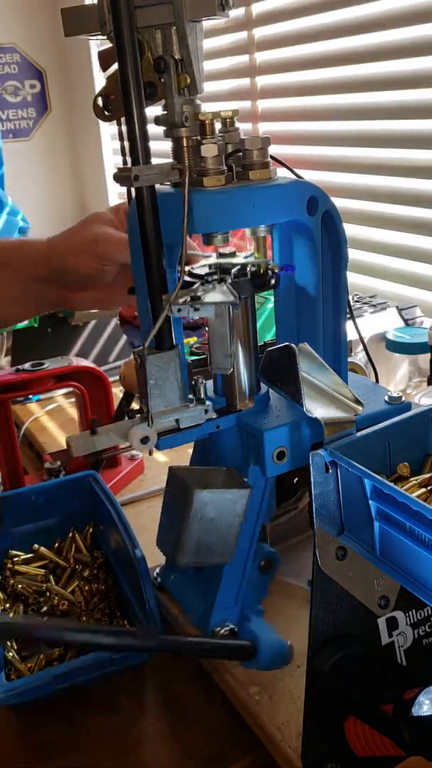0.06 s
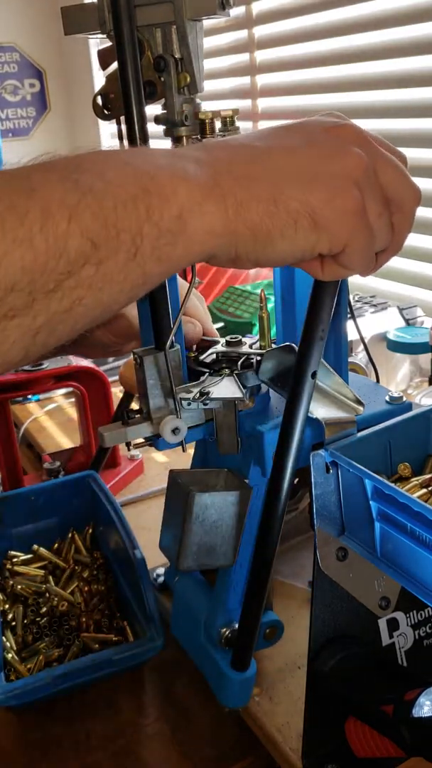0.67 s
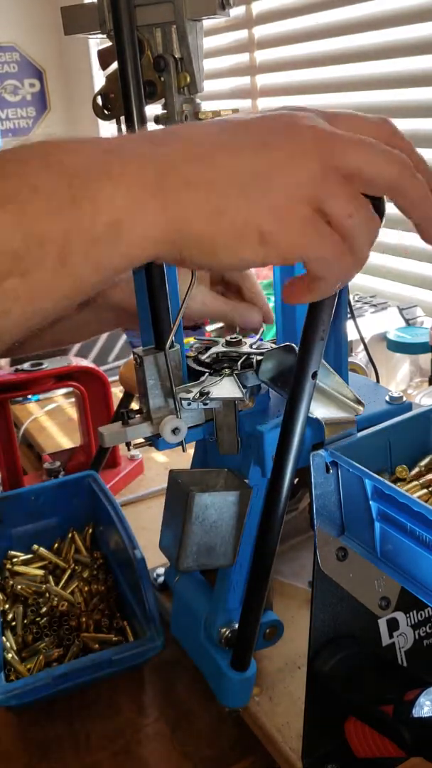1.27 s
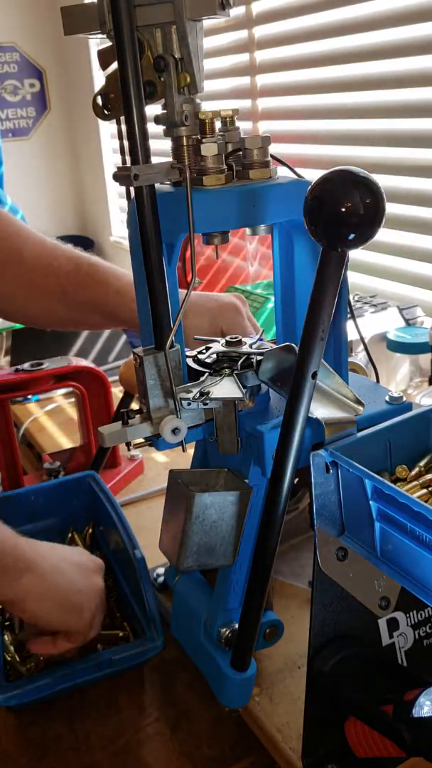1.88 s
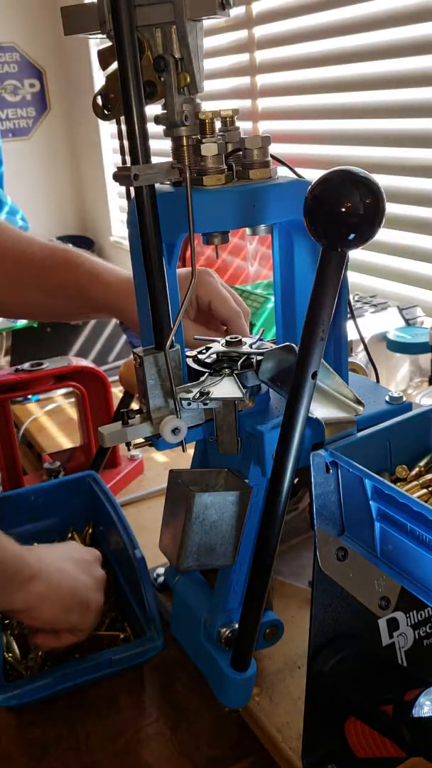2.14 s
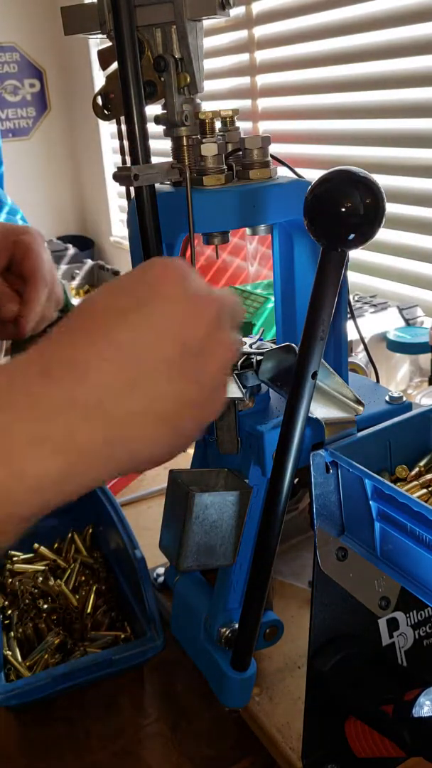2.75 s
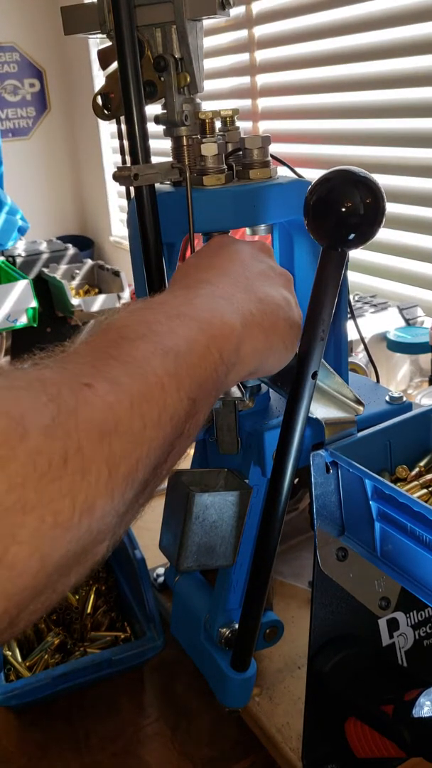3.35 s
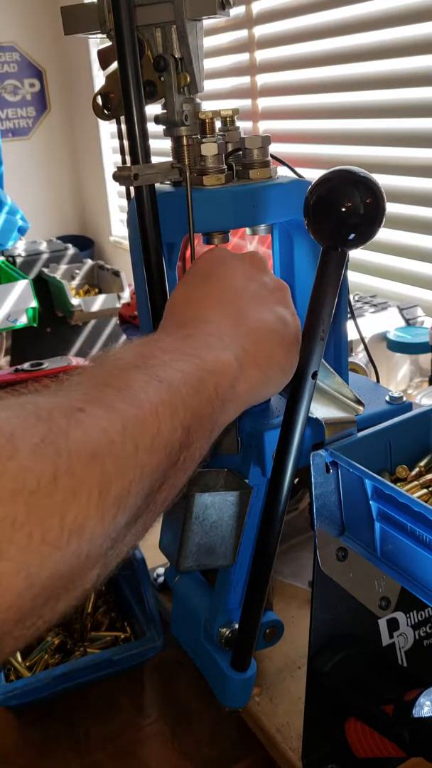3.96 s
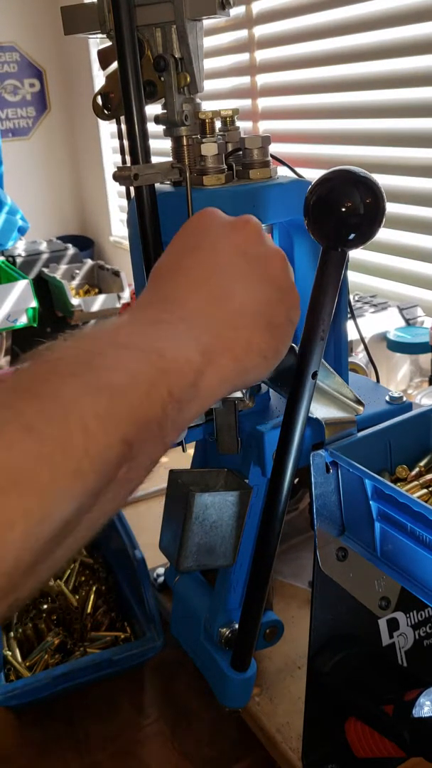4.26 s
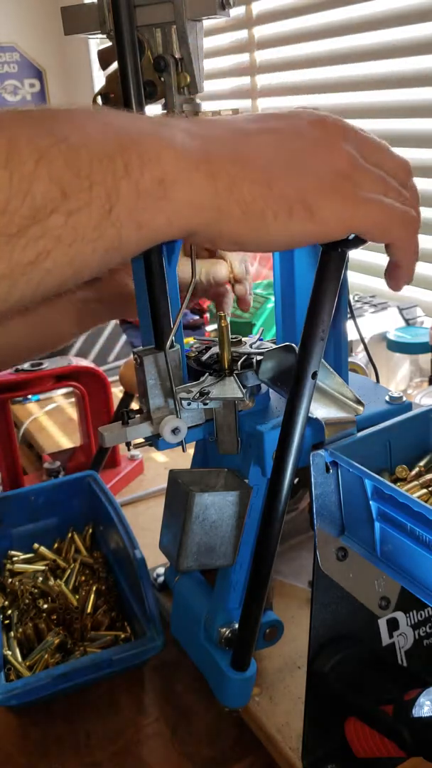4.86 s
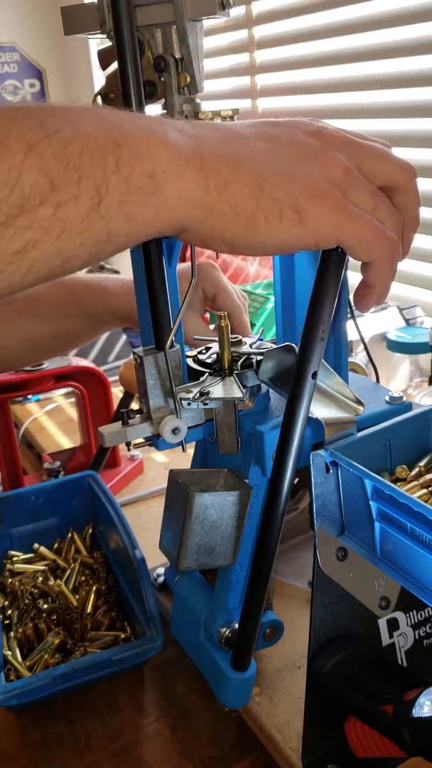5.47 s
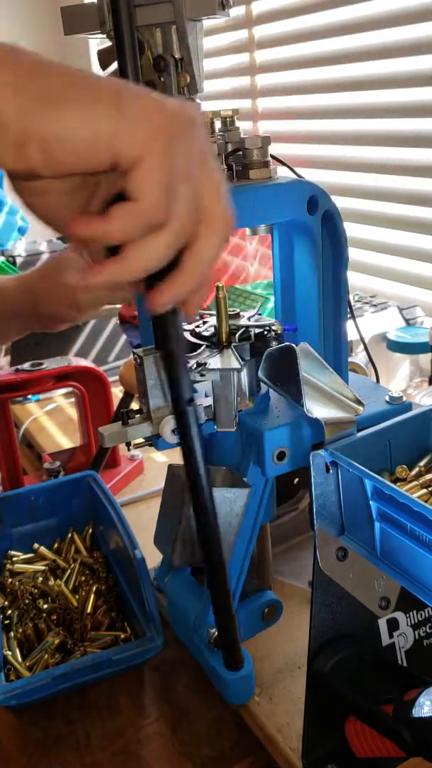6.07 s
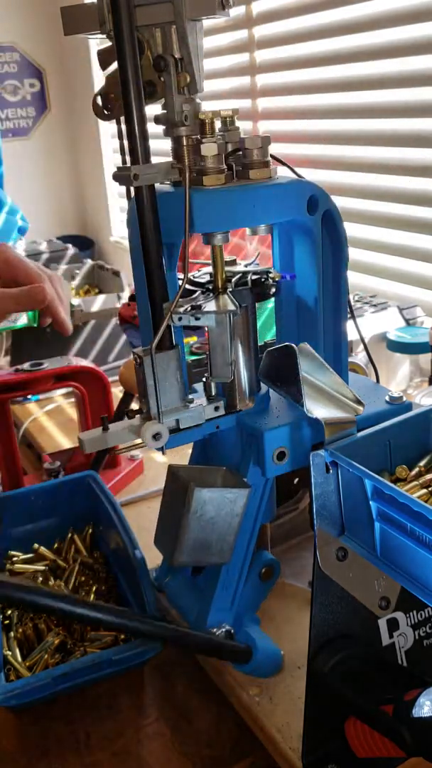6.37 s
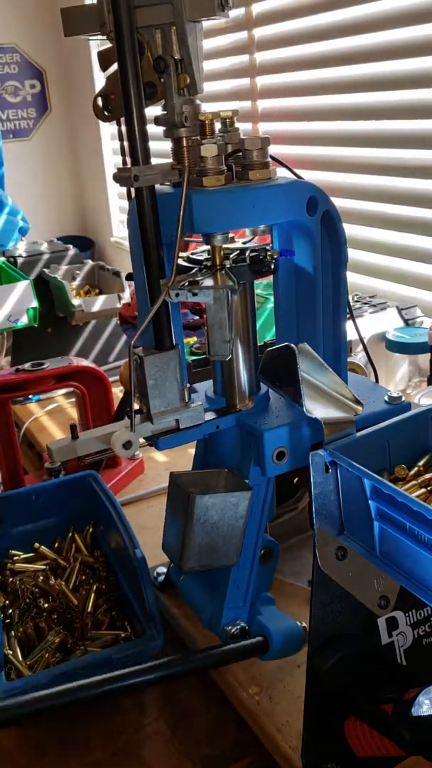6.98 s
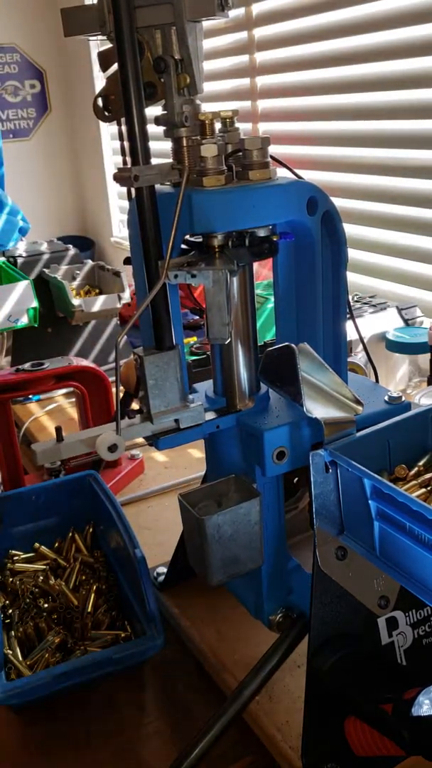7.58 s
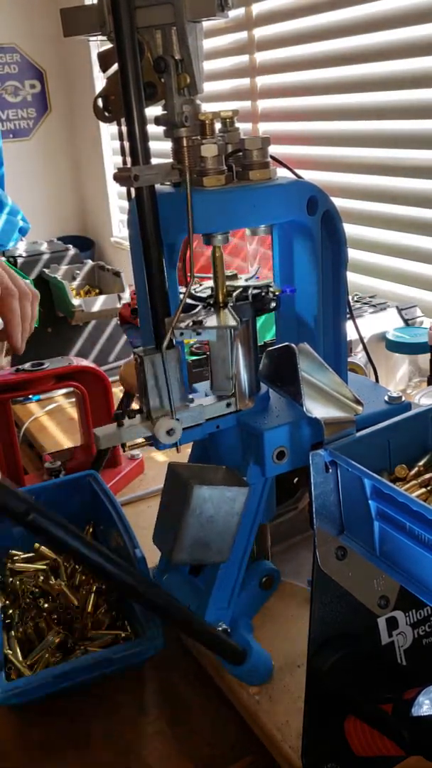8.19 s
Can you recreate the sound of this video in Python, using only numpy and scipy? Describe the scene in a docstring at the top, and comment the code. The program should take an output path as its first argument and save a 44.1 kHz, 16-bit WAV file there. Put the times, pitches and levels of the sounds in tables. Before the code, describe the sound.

In a small workshop with a faint low hum, the steel parts of a reloading press snap and slide near the microphone. Brass rings out and bounces in a plastic bin, and a heap of cases clinks as it is stirred. Small parts tick softly into place. Following a lull, the press runs through another stroke, clicking, scraping and knocking, the wooden bench thudding beneath it.

```python
"""Reloading press on a wooden bench

A hand-worked press clicks and slides in a small workshop, over room air and a faint motor hum.
A brass case pings free and tumbles into a plastic bin. A hand rummages for the next case and sets it
in the plate with a bullet on top; the lever is pulled again, clanking and thudding through the bench.
Contacts are short cracks of shaped noise; metal, plastic and wood ring in decaying modes."""
import sys
import numpy as np
from scipy import signal
from scipy.fft import rfft, irfft
from scipy.io import wavfile

SR = 44100
rng = np.random.default_rng(int(sys.argv[2]) if len(sys.argv) > 2 else 0)


def to_wav(sig):
    """Store sig (one row per channel, or 1-D mono) as 16-bit WAV at the path in sys.argv[1].

    Samples outside -1..1 are clipped; the rate is SR.
    """
    pcm = np.clip(np.atleast_2d(sig), -1, 1) * 32767
    pcm = np.round(pcm).astype(np.int16)
    wavfile.write(sys.argv[1], SR, pcm.T)  # frames by channels


N = 363384
TIME = np.arange(N) / SR

# stereo image of the room and of close sounds: frequency_hz, left_right_correlation
ROOM_IMAGE = [(100, 0.86), (250, 0.95), (500, 0.21), (1000, 0.7), (2000, 0), (16000, 0)]
CLOSE_IMAGE = [(200, 0.82), (1200, 0.84), (3000, 0.85), (8000, 0.45), (16000, 0.13)]
# bass-heavy colour of room air and bench rumble: frequency_hz, level_db
LOW_SPECTRUM = [(15, -51.5), (25, -22.5), (64, -11), (92, -9.5), (105, -9.5), (123, -2), (145, -8),
                (317, -20), (363, -22.5), (439, -19), (754, -35.5), (1790, -22.5), (2350, -38.5),
                (4490, -35.5), (16000, -49)]
# the lever loads the bench: start_s, level_db, tilt_db_per_octave
BENCH_THUDS = [(0.169, -56, 13.5), (.386, -41.5, 6.5), (.548, -43, 3.5), (0.624, -36, -0.5),
               (5.799, -45.5, 1.5), (6.284, -43, 5.5), (6.711, -31, -1.5), (7.126, -36, -2),
               (7.248, -34.5, 6), (7.507, -27, 1), (7.521, -30, -2), (7.737, -33.5, -4), (7.815, -37.5, 2),
               (7.841, -29.5, 0.5), (7.997, -26.5, -1), (8.149, -29, -5), (8.176, -36.5, 0)]
# single cases knock in the heap as the hand searches: start_s, level_db
HEAP_TAPS = [(1.7014, -29), (1.7265, -35), (1.845, -29), (1.926, -25), (1.954, -20), (1.9667, -13.5),
             (1.9751, -15), (1.999, -9), (2.0407, -5.5), (2.08, -8.5), (2.1904, -12), (2.2227, -19),
             (2.265, -13.5), (2.298, -19.5), (2.306, -21.5), (2.343, -24.5), (2.3764, -16.5),
             (2.3837, -21.5), (2.3912, -20.5), (2.4422, -14), (2.4614, -19.5), (2.4934, -48)]


def amp(db):
    """Decibels to gain."""
    return 10 ** (np.asarray(db) / 20)


def unit(x):
    """Scales to rms 1."""
    return x / np.sqrt(np.mean(x ** 2) + 1e-20)


def curve_at(points, hz):
    """Reads a curve on a log-frequency axis."""
    point_hz, value = np.transpose(points)
    return np.interp(np.log(hz + 1), np.log(point_hz + 1), value)


def add(mix, start_s, sound):
    """Drops a stereo sound into the mix."""
    part = mix[:, max(round(start_s * SR), 0):][:, :sound.shape[1]]
    part += sound[:, :part.shape[1]]


def panned(db):
    """Channel gains with the left louder by db."""
    return unit(amp([[db / 2], [-db / 2]]))


def colour(x, spectrum):
    """EQ by a curve of frequency_hz, level_db."""
    hz = np.fft.rfftfreq(x.shape[-1], 1 / SR)
    return irfft(rfft(x) * amp(curve_at(spectrum, hz)), x.shape[-1])


def stereo_noise(image, size=N):
    """White noise whose stereo width changes with frequency."""
    left, other = rfft(rng.standard_normal((2, size)))
    alike = np.clip(curve_at(image, np.fft.rfftfreq(size, 1 / SR)), -1, 1)
    return irfft([left, alike * left + np.sqrt(1 - alike ** 2) * other], size)


def decay(t, t60):
    """A fade that falls 60 dB in t60 seconds."""
    return np.exp(-np.log(1000) * t / t60)


def ring(hz, t60, phase_turns, size=16384):
    """One dying mode."""
    t = np.arange(size) / SR
    return np.sin(2 * np.pi * (hz * t + phase_turns)) * decay(t, t60)


def cluster(hz, spread_hz, t60, count):
    """Close modes that beat against each other, with their own phases on each side."""
    offsets = (np.arange(count) + rng.random(count)) / count * 2 - 1
    return sum(ring(hz + spread_hz * k, t60, rng.random((2, 1))) for k in offsets) / np.sqrt(count)


def struck(modes, spread_hz):
    """All modes of an object, each a beating cluster."""
    return sum(amp(db) * cluster(hz, spread_hz, t60, count=5) for hz, db, t60 in modes)


def gesture(start_s, length_s, db, swell_db_per_s, attack_s, release_t60):
    """Envelope of one movement: a quick attack, a hold that swells or sags, a release."""
    t = np.maximum(TIME - start_s, 0)
    hold = amp(db + swell_db_per_s * np.minimum(t, length_s))
    return np.minimum(t / attack_s, 1) * hold * decay(np.maximum(t - length_s, 0), release_t60)


def aftermath(hits, t60):
    """Envelope that jumps with each hit and then dies away."""
    power = np.zeros(N)
    for start_s, db, *_ in hits:
        power[round(start_s * SR)] += amp(db) ** 2
    return np.sqrt(signal.lfilter([1], [1, -decay(1 / SR, t60) ** 2], power + 1e-24))


def grains(per_s, spread_db, t60, size=1024):
    """A random train of tiny cracks, a few louder than the rest."""
    hits = amp(spread_db * np.minimum(rng.exponential(1, N), 3)) * (rng.random(N) < per_s / SR)
    power = signal.oaconvolve(hits ** 2, decay(np.arange(size) / SR, t60) ** 2)[:N]
    return unit(np.sqrt(abs(power)) * stereo_noise(CLOSE_IMAGE))


def contact(spectrum, db, tilt, t60, pan_db, lag_ms, snap_db, snap_t60, rise_s, size=8192):
    """A hard snap on a quickly dying crack of noise, reaching the left ear a little later."""
    t = np.arange(size) / SR
    tilted = [(hz, base + db + tilt * np.log2(np.clip(hz, 500, 12000) / 2500)) for hz, base in spectrum]
    crack = colour(stereo_noise(CLOSE_IMAGE, size), tilted)
    fall = decay(t, t60) + amp(snap_db) * decay(t, snap_t60)
    left, right = crack * panned(pan_db) * (1 - np.exp(-t / rise_s)) * fall
    return np.array([np.interp(t - lag_ms / 1000, t, left), right])


def with_frame(x):
    """Adds the ring of the press frame and its fittings."""
    # resonances: pitch_hz, width_hz, level_db
    modes = [(648.4, 44, -2.5), (1010, 98, -9.5), (1429, 31, -7), (2241, 75, -17), (3710, 120, -12),
             (4580, 37, -7), (7270, 200, -5)]
    return x + sum(amp(db) * signal.lfilter(*signal.iirpeak(hz, hz / width, SR), x)
                   for hz, width, db in modes)


def room_tone(air_db=6, waver_rad=0.22):
    """Low room air that slowly dips and swells, and a slightly wavering motor hum."""
    # fader ride of the air: time_s, level_db
    air_ride = [(0, -64.5), (1.0, -61.5), (1.4, -70), (2.7, -69.5), (4.0, -65.5), (8.24, -61.5)]
    # tones of a motor somewhere in the room: pitch_hz, level_db
    motor = [(60, -73), (120, -60.5), (303, -75.5)]
    air = unit(colour(stereo_noise(ROOM_IMAGE), LOW_SPECTRUM))
    drift = unit(colour(rng.standard_normal(N), [(0, 0), (2, 0), (12, -80)]))
    hum = sum(amp(db) * np.sqrt(2) * np.sin(2 * np.pi * hz * TIME + waver_rad * drift)
              for hz, db in motor)
    return amp(air_db + np.interp(TIME, *np.transpose(air_ride))) * air + hum


def sliding(slide_db=-2.5):
    """Ram and hand slide over metal with a fine stick and slip."""
    # movements: start_s, length_s, level_db, swell_db_per_s
    strokes = [(0.102, 0.37, -50.5, 4), (0.55, 0.054, -54.5, 0), (0.921, 0.3, -45.5, -7),
               (1.556, .36, -44, -27), (5.755, 0.052, -44, -100), (6.063, 0.36, -61.5, 36.5),
               (7.027, 0.071, -66, 2), (7.5, 0.074, -57, 19), (7.753, 0.28, -52.5, 24),
               (8.154, 0.064, -45, 20)]
    # colour of the scrape: frequency_hz, level_db
    spectrum = [(180, -43.5), (300, -6.5), (537, -3), (978, -2), (1190, -7.5), (1300, -4.5), (2650, -3.5),
                (5800, -3.5), (8790, -20), (16000, -12.5)]
    effort = sum(gesture(*stroke, attack_s=0.003, release_t60=0.33) for stroke in strokes)
    return amp(slide_db) * effort * unit(colour(grains(per_s=490, spread_db=3, t60=0.01), spectrum))


def steel_clicks(click_db=-4, ring_db=-13, ring_t60=0.09, spread_hz=70, ring_pan_db=-4):
    """Pawl, springs and plate snap, and cases tick on steel as they are ejected and set in place; the touched
    part rings at its own pitch, and the links with it."""
    # light steel contacts: start_s, level_db, tilt_db_per_octave, t60_s, pan_db, pitch_hz
    hits = [(0.1069, -30.5, -3.5, 0.16, 1, 3940), (0.1671, -32, -4.5, 0.098, -5, 4400),
            (0.1722, -21, 0.5, 0.045, -5, 3860), (0.1819, -23.5, -4.5, 0.1, 4, 4000),
            (0.216, -49, 7.5, 0.11, 1, 9250), (0.2589, -26, 0, 0.059, -3, 3990),
            (0.3009, -19, -4, 0.067, 0, 1710), (0.3496, -19.5, 0, 0.079, -1.5, 9300),
            (.3897, -21, -1.5, .057, -12, 4550), (0.3943, -21.5, -0.5, 0.061, 11, 6940),
            (0.4377, -25, 0, 0.066, 0, 4520), (0.545, -19.5, -1, 0.083, -1, 3940),
            (.6239, -29, -6, 0.094, 3, 4000), (.8476, -23, 1.5, .024, -0.5, 7800),
            (0.922, -34, 0, 0.057, -3, 5170), (0.96, -24.5, -1.5, 0.12, 4, 5250),
            (0.9764, -12, 1.5, 0.058, 1, 5500), (0.9857, -18.5, -4, 0.16, 2, 6000),
            (1.0635, -27.5, 0, 0.17, -1, 5940), (3.4274, -39.5, -0.5, 0.1, 3, 4940),
            (3.5667, -23.5, 0, 0.049, 3, 6519), (3.6606, -30, 0, 0.094, 3, 5600),
            (3.706, -20, -0.3, 0.1, -1, 5500), (5.7546, -30, -3.5, 0.043, 4.5, 4050),
            (5.82, -38, 0, 0.1, 0, 4500), (6.03, -35, -3.5, 0.095, 0, 1786),
            (6.1826, -24, -0.5, 0.11, -0.5, 3600), (6.2987, -25, 3, 0.03, 1, 5087),
            (6.3943, -23, -2.5, 0.12, 0.5, 5050), (7.1895, -27.5, -4, 0.068, 2, 3950),
            (7.908, -14, 1.5, 0.03, 0.5, 5340), (7.962, -26, -1.5, 0.19, -1, 5360),
            (8.1203, -25, -2.5, 0.064, -3.5, 1005), (8.18, -17.5, 2, 0.048, 1, 4280)]
    # colour of a click: frequency_hz, level_db
    spectrum = [(120, -23.5), (520, -5.5), (1250, -4), (2500, -3.5), (4200, -2.5), (7000, -4.5),
                (11000, -8.5), (16000, -7.5)]
    # ring of the steel links: pitch_hz, level_db, t60_s
    link_modes = [(3520, -22.5, .07), (3910, -23.5, 0.065), (4620, -19.5, 0.03), (5490, -20.5, .07)]
    cracks, rings = np.zeros((2, 2, N))
    for start_s, db, tilt, t60, pan_db, hz in hits:
        add(cracks, start_s, contact(spectrum, db, tilt, t60, pan_db,
                                     lag_ms=0.02, snap_db=2, snap_t60=0.0077, rise_s=0.0012))
        touched_part = amp(ring_db) * cluster(hz, spread_hz, ring_t60, count=4)
        add(rings, start_s, amp(db) * (touched_part + struck(link_modes, spread_hz)))
    return amp(click_db) * with_frame(cracks) + rings * panned(ring_pan_db)


def bench_thuds(rise_s=0.0044, detune=0.044, pivot_hz=140):
    """The bench takes the load softly, its modes tuned a little differently on every thud."""
    # body of the wooden bench: pitch_hz, level_db, t60_s
    modes = [(70, -14.5, .25), (115.4, -2.5, 0.24), (141.7, 4, 0.12), (174.8, -5.5, 0.34), (246, -14.5, .2),
             (307, -8, 0.15), (423, -10.5, 0.18), (491, -12, 0.14), (549.5, -11, .18), (653, -14.5, 0.13)]
    out = np.zeros((2, N))
    for start_s, force_db, tilt in BENCH_THUDS:
        body = 0
        for hz, db, t60 in modes:
            detuned_hz = hz * (1 + detune * rng.uniform(-1.1, 1))
            body += amp(db + tilt * np.log2(hz / pivot_hz)) * ring(detuned_hz, t60, rng.random())
        attack = 1 - np.exp(-np.arange(len(body)) / SR / rise_s)
        add(out, start_s, amp(force_db) * body * attack * panned(0))
    return out


def bench_rumble(rumble_db=-21, t60=0.3):
    """The bench and what stands on it keep trembling after each thud."""
    tremble = unit(colour(stereo_noise(ROOM_IMAGE), LOW_SPECTRUM))
    return amp(rumble_db) * aftermath(BENCH_THUDS, t60) * tremble


def case_clinks(pan_db=-3, jangle_db=2, jangle_spread_hz=600, jangle_t60=0.12, pivot_hz=14000):
    """A struck case jangles, then rings with beats, being never quite round."""
    # blows, whose place sets the modes' balance: start_s, level_db, tilt_db_per_octave, mouth_vs_wall_db
    hits = [(0.3488, -30.5, 11, -8), (0.848, -58.5, 13, 19), (1.1393, -13, 8, -19),
            (1.966, -28, 0.5, -17.5), (2.062, -24, 1, -17), (2.267, -14.5, 9, -24), (2.461, -22.5, 5, -25),
            (3.706, -43, 20, 8), (6.183, -39.5, 25, 11), (6.431, -38, 0.5, -30), (7.9072, -46, -2, 14.5),
            (8.1805, -18.5, 4.5, -2)]
    # ring of a brass case: pitch_hz, spread_hz, t60_s, level_db, share_at_mouth
    modes = [(5405, 200, 0.25, 2, 1), (11440, 170, 0.26, -19, 0.18), (13670, 320, .18, -0.5, 1),
             (16000, 250, .14, 0, 0.08)]
    out = np.zeros((2, N))
    for start_s, force_db, tilt, mouth_db in hits:
        for hz, spread_hz, t60, db, at_mouth in modes:
            gain = amp(force_db + db + tilt * np.log2(hz / pivot_hz) + mouth_db * at_mouth)
            tone = cluster(hz, spread_hz, t60, count=12)
            jangle = amp(jangle_db) * cluster(hz, jangle_spread_hz, jangle_t60, count=8)
            add(out, start_s, gain * (tone + jangle) * panned(pan_db))
    return out


def eject_pings(pan_db=-6, ring_db=-3, spread_hz=36, jangle_db=2, jangle_spread_hz=170, jangle_t60=0.07):
    """The ejected case touches steel twice: a short rough jangle, then a free ring."""
    # touches: start_s, level_db
    hits = [(0.9589, -26), (0.9747, -15.5)]
    # ring of brass on steel: pitch_hz, level_db, t60_s
    modes = [(2050, -20, 0.51), (2755, -7.5, 0.28), (3350, -21, 0.23), (3840, -9.5, .15), (3980, -3, .24),
             (4040, -10, .2), (4600, -6, .2), (5210, 1, .23), (6030, -6, 0.18), (8253, -16.5, 0.18),
             (9105, -20.5, 0.17), (10700, -19, 0.41), (12950, -10, .25), (14000, -9, 0.23),
             (15147, -13.5, .25)]
    out = np.zeros((2, N))
    for start_s, db in hits:
        jangle = amp(jangle_db) * struck([(*mode[:2], jangle_t60) for mode in modes], jangle_spread_hz)
        tone = amp(ring_db) * struck(modes, spread_hz)
        add(out, start_s, amp(db) * (tone + jangle) * panned(pan_db))
    return out


def bin_bounces(bounce_db=-4, spread_hz=50):
    """The finished round clacks on the hollow plastic bin, bounces and settles."""
    # landings: start_s, level_db, tilt_db_per_octave, t60_s, pan_db
    hits = [(1.1368, -3, 1.5, 0.042, -1.5), (1.1405, 2, 0.5, 0.031, 1), (1.1475, -15, 1, 0.16, 4),
            (1.1839, -6.5, -0.5, 0.078, 6), (1.1891, -0.5, -.5, 0.042, -4.5), (1.2385, -5, -0.5, 0.061, 4),
            (1.2444, 2, 0.14, 0.025, -0.5), (1.2511, -11, 1, .05, -4.5), (1.2793, -27, 4, .07, 3),
            (1.3752, -11, 0, 0.019, 1.5), (1.4094, -18, 4, 0.029, 1), (1.442, -31.5, 3.5, 0.039, 5)]
    # colour of a clack: frequency_hz, level_db
    spectrum = [(120, -48), (300, -28), (520, -19.5), (800, -7), (1250, 1.5), (1800, -9), (2600, -4),
                (4200, -8.5), (8000, -13), (11000, -16.5), (16000, -15.5)]
    # ring of the bin: pitch_hz, level_db, t60_s
    modes = [(791, -25, .04), (1403, -22, 0.045), (7500, -28.5, 0.046)]
    cracks, rings = np.zeros((2, 2, N))
    for start_s, db, tilt, t60, pan_db in hits:
        add(cracks, start_s, contact(spectrum, db, tilt, t60, pan_db,
                                     lag_ms=0.013, snap_db=2.5, snap_t60=0.011, rise_s=0.00088))
        add(rings, start_s, amp(db) * struck(modes, spread_hz))
    return amp(bounce_db) * with_frame(cracks) + rings


def heap_taps(tap_db=-4):
    """Single cases knock against the heap and its bin."""
    # colour of a tap: frequency_hz, level_db
    spectrum = [(120, -23.5), (520, -6.5), (1250, -0.5), (4200, -6.5), (11000, -20.5), (16000, -16.5)]
    out = np.zeros((2, N))
    for start_s, db in HEAP_TAPS:
        add(out, start_s, contact(spectrum, db, tilt=0, t60=0.047, pan_db=-0.5,
                                  lag_ms=0.2, snap_db=0, snap_t60=0.01, rise_s=0.00035))
    return amp(tap_db) * with_frame(out)


def rummage(clatter_db=-2, ring_db=-15, hits_per_s=140, ring_t60=0.18, unsettle_db=-25, cases=8):
    """Stirred by the hand and by each tap, loose cases clatter and ring at their own high pitches."""
    # ring of the loose cases: pitch_hz, spread_hz, level_db
    modes = [(10950, 40, -14.5), (11230, 360, -4.5), (11740, 57, -6.5), (15700, 260, 0.5)]
    # colour of cases knocking on plastic: frequency_hz, level_db
    spectrum = [(150, -53.5), (280, -24.5), (480, -5.5), (586, -3), (788, 1.5), (875, -10.5), (955, 3),
                (1260, 0.5), (2240, -12.5), (4340, 2.5), (10000, -17.5), (11100, -1), (12500, -9.5),
                (14200, -16), (15200, 2), (16000, -3.5)]
    dig = gesture(start_s=1.943, length_s=0.137, db=-25, swell_db_per_s=13,
                  attack_s=0.022, release_t60=0.12)
    stir = dig + amp(unsettle_db) * aftermath(HEAP_TAPS, t60=0.22)
    rings = np.zeros((2, N))
    for hz, spread_hz, db in modes * cases:
        hits = rng.standard_normal((2, N)) * (rng.random(N) < hits_per_s / SR) * stir
        tone = ring(hz + spread_hz * rng.uniform(-0.66, 1), ring_t60, 0)
        rings += amp(db) * signal.oaconvolve(hits, tone[None], axes=1)[:, :N]
    clatter = unit(colour(grains(per_s=600, spread_db=2, t60=0.016), spectrum)) * stir
    return amp(clatter_db) * clatter + amp(ring_db) * rings


def seating_tinks(pan_db=-5, spread_hz=160):
    """Case and bullet tink lightly as they are set in place."""
    # touches: start_s, level_db
    hits = [(3.4277, -33), (3.5673, -31), (3.7065, -46)]
    # ring of the small brass parts: pitch_hz, level_db, t60_s
    modes = [(3591, -9.5, 0.04), (5040, 4, 0.023), (7316, -2.5, 0.031), (14500, -6, .06)]
    out = np.zeros((2, N))
    for start_s, db in hits:
        add(out, start_s, amp(db) * struck(modes, spread_hz) * panned(pan_db))
    return out


def lever_knocks(knock_db=-4, spread_hz=30):
    """The lever takes up its play and meets its stops, ringing with each heavy, dull blow."""
    # blows: start_s, level_db, tilt_db_per_octave, t60_s, pan_db
    hits = [(6.704, -22.5, -1, 0.066, 4), (6.7204, -12, -0.5, 0.083, 0), (7.1254, -15.5, 0.7, 0.16, 0),
            (7.2464, -7.5, 2, .097, 5), (7.2509, -4, 2.5, 0.056, -2.5), (7.5094, -22.5, -1, 0.11, 3),
            (7.73, -34.5, 0, 0.17, 0), (7.765, -16, -2, 0.11, 0), (7.8157, -23, -2.5, 0.15, -6),
            (7.847, -22.5, 3, 0.092, -1), (8.001, -18, -3.5, 0.1, 4.5), (8.1644, -24.5, -4.5, 0.075, 5)]
    # colour of a knock: frequency_hz, level_db
    spectrum = [(120, -21), (520, 1.5), (1250, -8.5), (4200, -12), (11000, -29.5), (16000, -33)]
    # ring of the lever: pitch_hz, level_db, t60_s
    modes = [(1530, -27.5, 0.11), (2148, -28, 0.078), (4900, -27.5, 0.056)]
    cracks, rings = np.zeros((2, 2, N))
    for start_s, db, tilt, t60, pan_db in hits:
        add(cracks, start_s, contact(spectrum, db, tilt, t60, pan_db,
                                     lag_ms=0.011, snap_db=-1.5, snap_t60=0.008, rise_s=0.00062))
        add(rings, start_s, amp(db) * struck(modes, spread_hz))
    return amp(knock_db) * with_frame(cracks) + rings


def workshop_reverb(x, build_s=0.012, size=26000):
    """Dense reflections from bench and walls, each band dying at its own speed."""
    # decay of the room: frequency_hz, t60_s
    decay_times = [(100, 0.26), (300, .42), (1000, .35), (3000, 0.29), (6000, 0.29), (11000, 0.22),
                   (16000, 0.31)]
    hz, t, bands = signal.stft(stereo_noise(ROOM_IMAGE, size), SR, nperseg=256)
    tail = signal.istft(bands * decay(t, curve_at(decay_times, hz)[:, None]), SR, nperseg=256)[1]
    tail *= 1 - np.exp(-(np.arange(tail.shape[1]) / SR / build_s) ** 2)
    return signal.fftconvolve(x, tail / np.linalg.norm(tail[0]), axes=1)[:, :N]


def scene():
    """The close sounds with their reverb, over bench rumble and room tone."""
    # sound, reverb_send_db
    stems = [(steel_clicks(), -7), (lever_knocks(), -5.5), (bin_bounces(), -9.5), (heap_taps(), -7),
             (case_clinks() + eject_pings() + seating_tinks(), -9.5),
             (bench_thuds(), -6.5), (rummage(), -3.5), (sliding(), -2)]
    direct = sum(sound for sound, _ in stems)
    send = sum(sound * amp(send_db) for sound, send_db in stems)
    return direct + workshop_reverb(send) + bench_rumble() + room_tone()


def record(dry):
    """Limits peaks to full scale and cuts the very top of the treble."""
    lowpass = signal.firwin(401, cutoff=15850, window=("kaiser", 7), fs=SR)
    return signal.oaconvolve(np.clip(dry, -1, 1), lowpass[None], "same")


dry = scene()
out = record(dry)
to_wav(out)
```